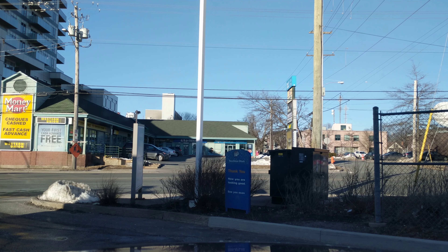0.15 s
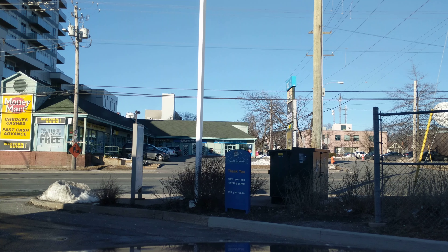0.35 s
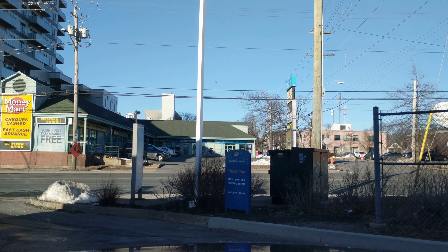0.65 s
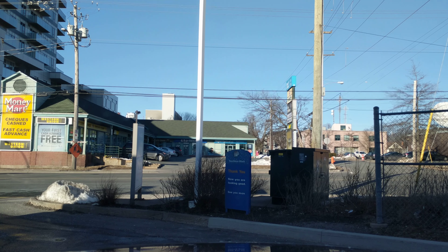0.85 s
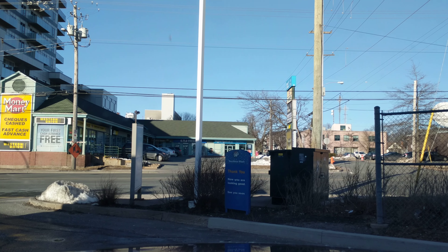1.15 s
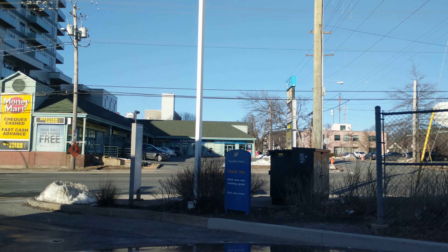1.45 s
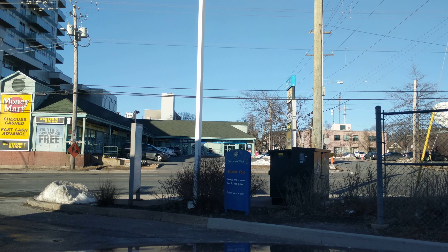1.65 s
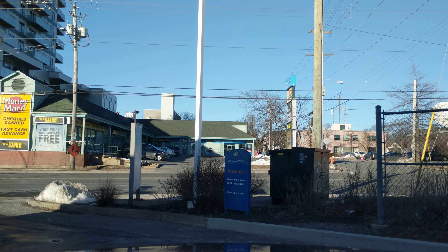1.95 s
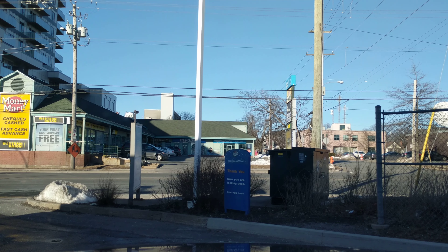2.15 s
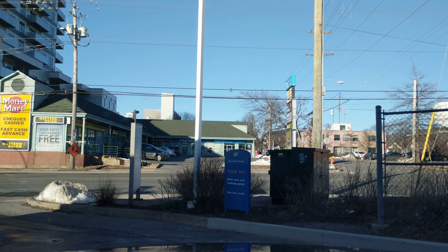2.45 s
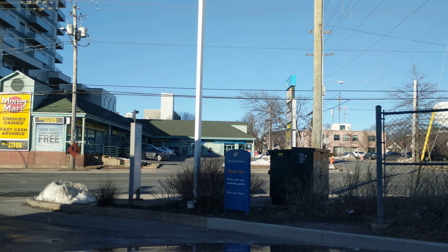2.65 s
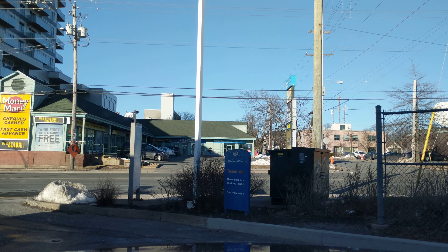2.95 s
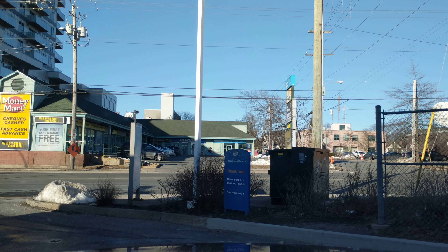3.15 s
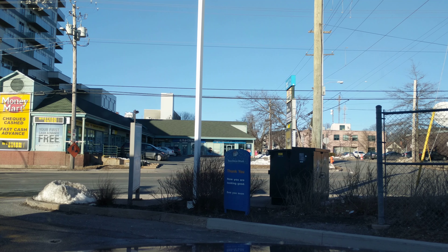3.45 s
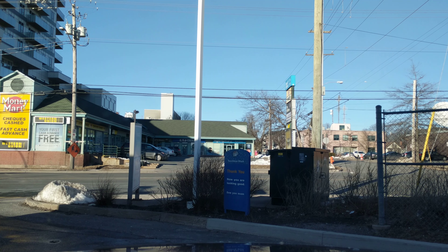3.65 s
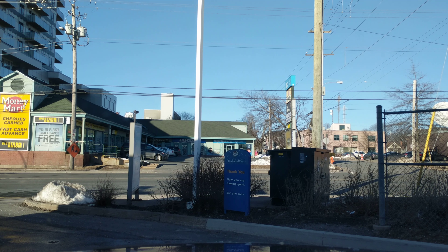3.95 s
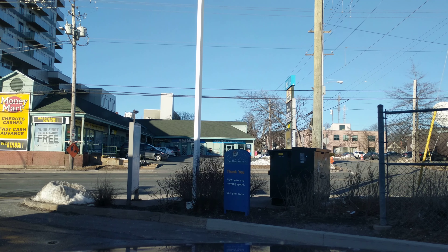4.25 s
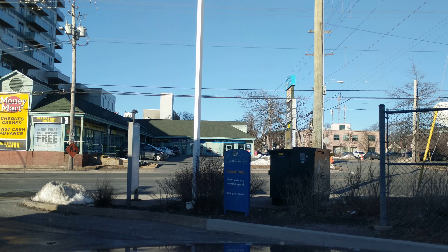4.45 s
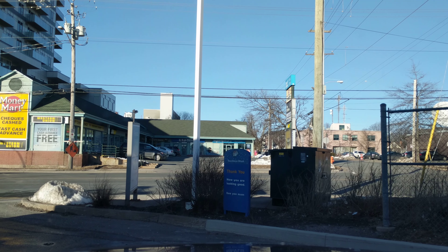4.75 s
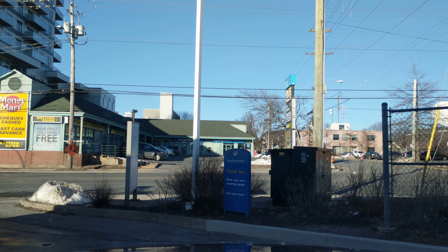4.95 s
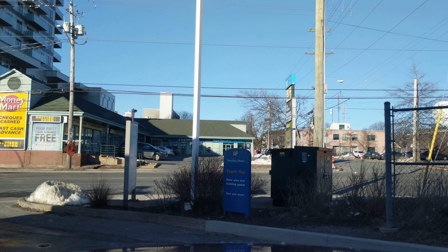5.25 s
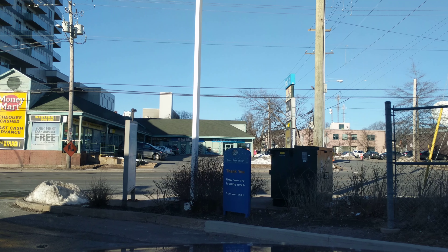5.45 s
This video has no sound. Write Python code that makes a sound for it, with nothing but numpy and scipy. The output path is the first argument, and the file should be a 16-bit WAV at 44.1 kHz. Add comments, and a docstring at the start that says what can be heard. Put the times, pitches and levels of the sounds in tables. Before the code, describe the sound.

From 0 s a full, continuous roar of large air blowers fills a closed car, heard in mono from the seats. It is bass-heavy and muffled: floor rumble and panel drumming under a broad, dull rush, with only soft hiss on top. A very low cabin boom throbs unevenly, dipping around 1.4 s and surging near 1.8, 3.7 and 4.6 s. A steady-pitched mid hum from the fan blades comes and goes, clearest in the first three seconds and again briefly near 4.9 s. A thin motor whine, slightly stronger from about 2.3 to 4.4 s, and a breathy hollow rush stay buried in the noise. Small air buffets press at about 3.1 and 4.4 s. From roughly 5.1 s the boom pulses harder and the roof drums in a deeper gust around 5.4 s, while the hiss and hum fade slightly. The roar is still running at the end, about 5.6 s.

```python
"""Car-wash dryer from inside the car

Dryer blowers roar over a closed car, heard from the seats. Jets: noise coloured by body resonances,
split into bands that swell and flutter separately. The cabin booms, blades and motors add wavering
sines, and a gap's hollow rush and a late roof thrum are narrow noise bands."""
import sys
import numpy as np
from scipy import signal
from scipy.fft import rfft, irfft, next_fast_len
from scipy.io import wavfile
from scipy.ndimage import uniform_filter1d

SR = 44100
rng = np.random.default_rng(int(sys.argv[2]) if len(sys.argv) > 2 else 0)


def put_to_file(sound):
    """Save the sound as 16-bit audio at rate SR, in the file named by the first command-line argument."""
    columns = np.atleast_2d(sound).T  # one column per channel
    safe = np.clip(columns, -1, 1)
    whole_steps = np.round(safe * 32767)
    wavfile.write(sys.argv[1], SR, whole_steps.astype(np.int16))


N = 246959
TIME_S = np.arange(N) / SR


def gain_of(level_db):
    """Amplitude factor of a level in dB."""
    return 10 ** (np.asarray(level_db) / 20)


def curve(rows):
    """Columns after time, interpolated to one value a sample."""
    time_s, *columns = np.transpose(rows)
    return [np.interp(TIME_S, time_s, column) for column in columns]


def wander(rate_hz):
    """Random drift of rms 1: noise under a Gaussian low-pass, amplitude 1/e at rate_hz."""
    size = next_fast_len(N)
    hz = np.fft.rfftfreq(size, 1 / SR)
    spectrum = rfft(rng.standard_normal(size)) * np.exp(-(hz / rate_hz) ** 2)
    drift = irfft(spectrum, size)[:N]
    return drift / drift.std()


def tone(pitch_hz, level_db, waver_hz, waver_db, rate_hz):
    """Sine of given rms level with randomly wavering pitch and strength."""
    turns = np.cumsum(pitch_hz + waver_hz * wander(rate_hz)) / SR + rng.random()
    strength = np.sqrt(2) * gain_of(level_db + waver_db * wander(rate_hz))
    return strength * np.sin(2 * np.pi * turns)


def breathy(pitch_hz, level_db, width_hz):
    """Narrow noise band of given rms level: two random drifts on quadrature carriers."""
    phase = 2 * np.pi * np.cumsum(pitch_hz * np.ones(N)) / SR
    in_phase = wander(width_hz / 2) * np.cos(phase)
    quadrature = wander(width_hz / 2) * np.sin(phase)
    return gain_of(level_db) * (in_phase + quadrature)


# turbulent air through the shell, spectral shape within each part: (frequency [Hz], density [dB per Hz])
ROAR_SPECTRUM = [(16, -30), (31, -12), (53, -3), (82, -2), (265, -8), (386, -13), (505, -19), (625, -19.5),
                 (734, -21), (1100, -27), (1550, -29.5), (1780, -33.5), (3560, -38.5), (8170, -64.5),
                 (16800, -74.5)]
# panel and cabin resonances and dips: (centre [Hz], full width at half the dB [Hz], height [dB])
PANEL_RESONANCES = [(60.3, 29, 5), (96.3, 5.2, -3.5), (113.4, 3.7, 9.5), (170, 15, 0.5), (230, 13, -3),
                    (300, 25, -0.5), (404.5, 22, 3), (500, 240, -1), (641, 44, 4.5), (825, 95, 1.5),
                    (1196, 120, 3), (1588, 72, -4.5), (1875, 94, 2.5), (2030, 110, 3.5), (2750, 210, -1.5),
                    (3230, 730, -2.5), (5270, 300, 1.5), (9400, 200, 0), (10900, 900, 1), (12600, 500, 2),
                    (15500, 4000, 1.5), (11800, 60, 3)]
# bands of floor rumble, roof drumming, door panels, dashboard, glass roar, hollow rush, seal hiss,
# fine hiss: (low [Hz], high [Hz])
PART_BANDS = [(20, 135), (135, 230), (230, 410), (410, 560), (560, 1600), (1600, 4500), (4500, 8000),
              (8000, 20000)]
# same parts as the jets creep along: (crossing time [s], level there [dB], fall [dB/s^2],
# share of buffets [1], share of treble swell [1], flutter [dB rms, sign immaterial])
PART_LEVELS = [(0.19, -22, 0.03, 0.78, .02, -1.2), (2.5, -26, 0.01, 0.86, .02, 1.5),
               (2.56, -27, 0.41, 0.0016, 0.5, 1.03), (0.89, -36, -0.01, 0.24, 0.17, 1.2),
               (3.5, -30, 0.09, 0, 0.031, 0.04), (2.6, -38, 0.06, 0.0047, 0.22, 0.16),
               (2.6, -53.5, 0, 0.2, 0.87, 0.5), (2.3, -64.5, 0.15, 0.3, .95, 0.7)]
# air buffets, before each part's share: (peak time [s], 1/e half-length [s], rise [dB])
AIR_BUFFETS = [(3.149, 0.088, 2), (4.411, 0.49, 2), (5.416, 0.35, 4)]
# treble swell, before each part's share: (time [s], level [dB])
TREBLE_SWELL = [(0.0, 0), (0.5, 0), (0.75, 1), (1.2, 1), (1.7, 0), (2.3, 0.1), (2.8, 0.7), (4.2, 1),
                (4.6, 1), (5.6, -2)]


def jets():
    """Turbulent jets shake the shell; resonances colour the noise and each part has its own level."""
    hz = np.fft.rfftfreq(N, 1 / SR)
    roar_hz, roar_db = np.transpose(ROAR_SPECTRUM)
    colour_db = np.interp(np.log(hz + 1), np.log(roar_hz + 1), roar_db)
    for centre_hz, width_hz, height_db in PANEL_RESONANCES:
        colour_db += height_db / (1 + (2 * (hz - centre_hz) / width_hz) ** 2)
    spectrum = rfft(rng.standard_normal(N)) * gain_of(colour_db)

    buffet_db = np.zeros(N)
    for peak_s, length_s, rise_db in AIR_BUFFETS:
        buffet_db += rise_db * np.exp(-((TIME_S - peak_s) / length_s) ** 2)
    treble_db, = curve(TREBLE_SWELL)

    roar = np.zeros(N)
    for (low_hz, high_hz), levels in zip(PART_BANDS, PART_LEVELS):
        crossing_s, crossing_db, fall_db, buffet_share, treble_share, flutter_db = levels
        part = irfft(spectrum * (hz >= low_hz) * (hz < high_hz), N)
        level_db = crossing_db - fall_db * (TIME_S - crossing_s) ** 2
        level_db += buffet_share * buffet_db + treble_share * treble_db
        level_db += flutter_db * wander(38)
        roar += part / part.std() * gain_of(level_db)
    return roar


# cabin boom pitch: (time [s], frequency [Hz])
BOOM_PITCH_CURVE = [(0.0, 52.03), (0.7, 55.35), (1.0, 47.94), (1.8, 43.94), (2.35, 43.96), (2.7, 51),
                    (3.4, 45.64), (4.5, 45.46), (5.6, 44.02)]
# cabin boom, mean before waver: (time [s], level [dB])
BOOM_LEVEL = [(0.0, -21), (0.12, -23), (0.36, -26), (0.7, -23.5), (0.95, -22), (1.1, -20.5), (1.38, -37),
              (1.62, -25), (1.7, -24), (1.8, -18), (2.03, -31), (2.3, -24), (2.55, -25.5), (2.8, -28),
              (2.95, -22), (3.35, -28), (3.7, -19.5), (4.05, -21.5), (4.25, -23), (4.58, -18.5),
              (4.77, -25), (4.95, -22), (5.12, -16.5), (5.25, -22), (5.42, -16.5), (5.6, -24)]


def boom():
    """Cabin air swings on its lowest resonance: one wavering low sine."""
    pitch_hz, = curve(BOOM_PITCH_CURVE)
    level_db, = curve(BOOM_LEVEL)
    return tone(pitch_hz, level_db, waver_hz=1.6, waver_db=1.6, rate_hz=14)


BLADE_HZ, OCTAVE_DB = 614.6, -54.5
# blade-passing tone, mean before waver: (time [s], level [dB])
BLADE_LEVEL = [(0.0, -33), (0.17, -35), (0.3, -46), (0.45, -33.5), (0.85, -29.5), (0.92, -36),
               (1.05, -29.5), (1.3, -35.5), (1.45, -30), (1.56, -54), (1.65, -31.5), (1.75, -44),
               (1.9, -37), (2.1, -32.5), (2.2, -31), (2.38, -32.5), (2.55, -36.5), (2.64, -28), (2.76, -40),
               (2.93, -29.5), (3.05, -38), (3.3, -34.5), (3.55, -42), (3.85, -37.5), (4.3, -38),
               (4.55, -43), (4.72, -43), (4.86, -31), (4.95, -40), (5.1, -38), (5.6, -60)]


def blades():
    """Passing fan blades pulse the air: a fundamental and its octave."""
    level_db, = curve(BLADE_LEVEL)
    fundamental = tone(BLADE_HZ, level_db, waver_hz=0.5, waver_db=1.2, rate_hz=8)
    octave = tone(2 * BLADE_HZ, OCTAVE_DB, waver_hz=0.9, waver_db=2.5, rate_hz=4.4)
    return fundamental + octave


MOTOR_HZ = 180.45
# magnetic whine lines: (multiple of MOTOR_HZ [1], level re WHINE_LEVEL [dB])
MOTOR_LINES = [(6, 4), (8, -14), (15, -12), (18, -12), (19, -10)]
# reference for the motor lines: (time [s], level [dB])
WHINE_LEVEL = [(0.0, -52), (0.9, -52.5), (1.9, -53), (2.3, -48), (3.0, -49), (3.5, -48), (4.4, -47.5),
               (4.7, -57), (5.1, -54), (5.3, -49), (5.6, -48)]
# other faint tones: (frequency [Hz], level [dB])
FAINT_TONES = [(1342, -63), (1697, -58), (11613, -87), (11643, -88.5)]


def motors():
    """Magnetic whine at multiples of one motor frequency, plus other thin tones."""
    whine_db, = curve(WHINE_LEVEL)
    lines = [(multiple * MOTOR_HZ, whine_db + line_db) for multiple, line_db in MOTOR_LINES]
    lines += FAINT_TONES
    return sum(tone(hz, level_db, waver_hz=0.7, waver_db=1.1, rate_hz=2.96) for hz, level_db in lines)


HOLLOW_WIDTH_HZ = 145
# hollow note drifting as the jets move: (time [s], frequency [Hz], level [dB])
HOLLOW_NOTE = [(0.0, 1748, -48), (0.7, 1832, -47.5), (1.3, 1818, -44), (2.2, 1769, -46.5),
               (2.9, 1782, -44.5), (4.0, 1746, -46), (4.8, 1784, -46), (5.6, 1795, -58)]


def hollow():
    """Air rushing past a gap: a wide breathy note with flutter."""
    pitch_hz, level_db = curve(HOLLOW_NOTE)
    flutter = gain_of(0.9 * wander(12))
    return breathy(pitch_hz, level_db, HOLLOW_WIDTH_HZ) * flutter


THRUM_PEAK_S, THRUM_LENGTH_S, THRUM_WIDTH_HZ = 5.45, 0.3, 40
# roof notes at the peak of the thrum: (frequency [Hz], level [dB])
ROOF_NOTES = [(76, -30), (158, -22.5)]


def thrum():
    """Roof panel drums in the last buffet: noise bands under a Gaussian swell."""
    swell = np.exp(-((TIME_S - THRUM_PEAK_S) / THRUM_LENGTH_S) ** 2)
    return swell * sum(breathy(hz, level_db, THRUM_WIDTH_HZ) for hz, level_db in ROOF_NOTES)


def scene():
    """Sum of all sources, one channel."""
    return (jets() + boom() + blades() + motors() + hollow() + thrum())[None]


LOW_CUT_HZ, HIGH_CUT_HZ = 24.5, 16990
RESTING_DB, SQUEEZE, LISTEN_S = -17, 0.13, 0.018  # SQUEEZE: share of each dB swing undone
CEILING = 0.75  # full scale = 1


def record(dry):
    """Microphone bass cut, gain control, soft peak rounding, then band limit."""
    bass_cut = signal.butter(3, LOW_CUT_HZ, "high", fs=SR, output="sos")
    heard = signal.sosfilt(bass_cut, dry)
    span = round(LISTEN_S * SR)
    power = uniform_filter1d(uniform_filter1d(heard ** 2, span), span)  # two centred averages
    power_db = 10 * np.log10(abs(power) + 1e-9)
    evened = heard / gain_of(SQUEEZE * (power_db - RESTING_DB))
    rounded = CEILING * np.tanh(evened / CEILING)
    band_limit = signal.firwin(1023, HIGH_CUT_HZ, window=("kaiser", 9), fs=SR)
    return signal.oaconvolve(rounded, band_limit[None], "same")


dry = scene()
out = record(dry)
put_to_file(out)
```